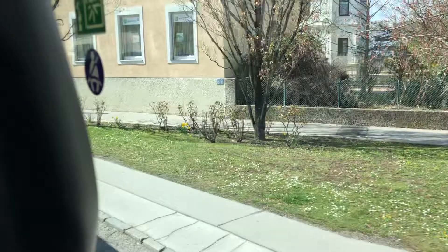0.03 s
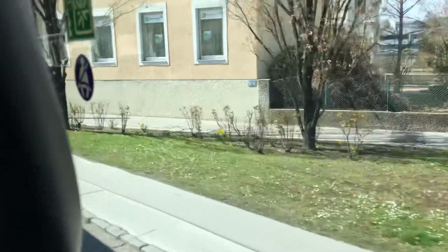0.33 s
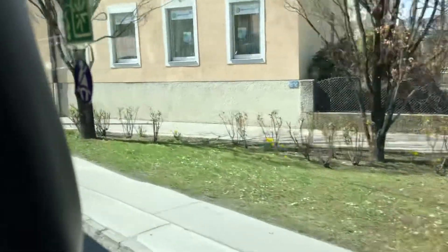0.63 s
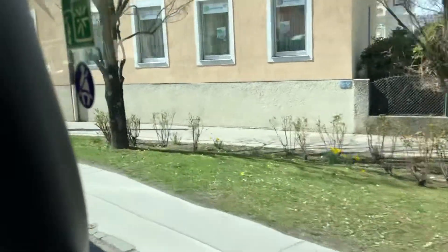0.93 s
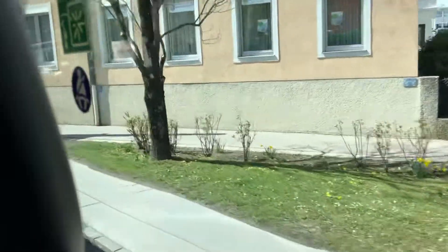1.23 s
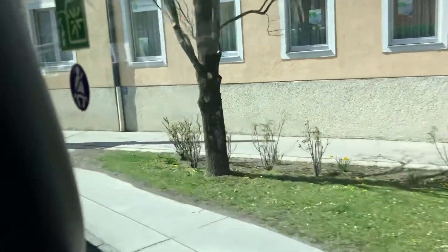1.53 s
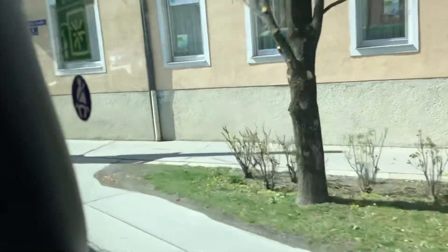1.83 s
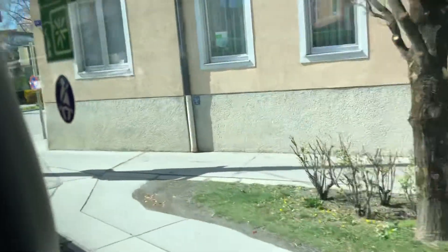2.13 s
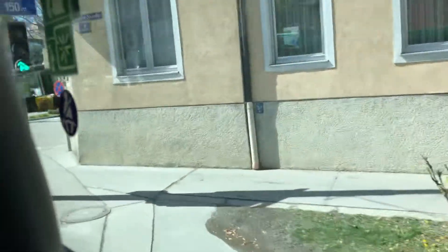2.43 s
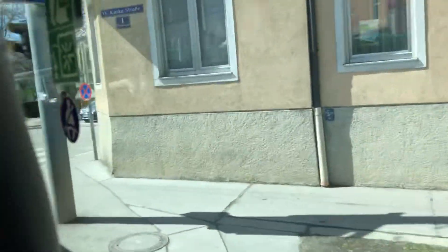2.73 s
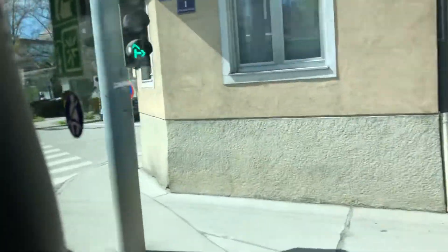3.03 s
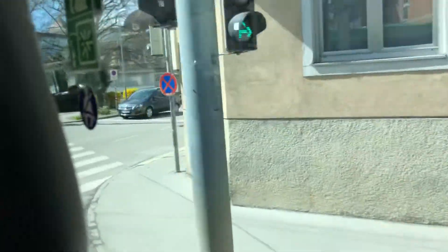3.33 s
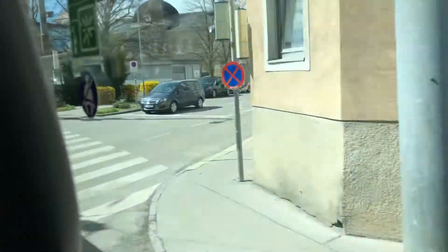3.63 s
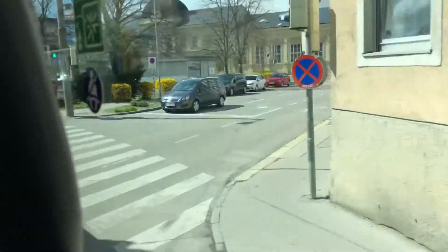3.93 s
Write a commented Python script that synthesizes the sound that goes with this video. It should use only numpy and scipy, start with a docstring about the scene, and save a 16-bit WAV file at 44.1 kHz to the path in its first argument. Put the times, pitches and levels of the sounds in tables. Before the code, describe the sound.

A city bus drives along a street, heard from a window seat inside. Its engine drones and gears whine as it eases off with a brief shudder, coasts, then speeds up slightly. Tyres rumble, with a few soft thuds.

```python
"""City bus, inside, rolling along a street: it eases off with a brief shudder, coasts, then speeds up.
Gears whine with road speed; engine firings drive a cabin boom, low tones and a pulsing roar.
Tyres rumble through the body, which heaves over uneven road and thuds at joints.
Behind that, air rushes, vents and a fan sing faintly, the trim ticks and a thin hiss comes and goes."""
import sys
import numpy as np
from scipy import signal
from scipy.fft import rfft, irfft
from scipy.io import wavfile
from scipy.ndimage import uniform_filter1d

SR = 44100
rng = np.random.default_rng(int(sys.argv[2]) if len(sys.argv) > 2 else 0)


def transcribe(signal):
    """Save signal, clipped to [-1, 1], as a 16-bit WAV file at the path in sys.argv[1]."""
    frames = np.atleast_2d(signal).T
    limited = np.clip(frames, -1, 1)
    pcm = np.round(limited * 32767).astype(np.int16)
    wavfile.write(sys.argv[1], SR, pcm)


N = 176400


def drivetrain():
    """Engine and gears: the engine runs free near idle, then the clutch locks it to one firing a turn."""
    whine_pitch = [(0.0, 407.4), (0.1, 393.0), (0.27, 371.3), (0.44, 353.1), (0.7, 339.6), (0.95, 329.5),
                   (1.3, 327.3), (1.7, 321.7), (1.9, 324.8), (2.25, 320.1), (2.6, 312.3), (3.02, 306.5),
                   (3.45, 301.4), (3.62, 308.5), (3.8, 323.0), (4.0, 335.9)]  # t/s, f/Hz
    free_firing = [(0, 46), (.25, 45), (.37, 44.3), (.48, 46.8), (.63, 47.5), (.75, 49.6)]  # t/s, firing rate/Hz
    engine_load = [(0, -44.5), (.35, -43.5), (.52, -44), (.8, -44), (1.25, -48), (2.5, -49.5), (3, -45.5),
                   (3.4, -51.5), (3.7, -47), (4, -46)]  # t/s, relative level/dB
    whine_per_turn, speed_jitter = 6.8, 0.00124
    lock_s = free_firing[-1][0]
    whine_hz = curve(whine_pitch) * (1 + speed_jitter * walk(15))
    whine_cycles = np.cumsum(whine_hz) / SR
    turns = whine_cycles / whine_per_turn
    firing_hz = np.where(seconds() < lock_s, curve(free_firing), whine_hz / whine_per_turn)
    firings = np.cumsum(firing_hz) / SR
    load = undb(curve(engine_load))
    return (cabin_boom(firings) + gears(whine_cycles, turns) + engine_tones(firings, load)
            + engine_roar(firings, load) + shudder(firings))


def cabin_boom(firings):
    """The cabin booms at four cycles per firing."""
    boom_level = [(0, -42), (.17, -47), (.25, -25.5), (.33, -34), (.43, -30), (.55, -34), (.73, -40.5),
                  (.81, -28.5), (1, -38), (1.12, -31.5), (1.66, -31), (1.75, -40.5), (1.94, -28.5),
                  (2.06, -38), (2.25, -28.5), (2.43, -31.5), (2.55, -48), (2.64, -27.5), (2.8, -35.5),
                  (3.06, -28), (3.14, -41), (3.4, -29), (3.5, -29.5), (3.62, -35.5), (4, -36.5)]  # t/s, relative level/dB
    return undb(curve(boom_level) + 0.5) * tone(4 * firings, rough=0.14, rate_hz=25)


def gears(whine_cycles, turns):
    """Tones locked to road speed: a whine, its third harmonic, a low note, an upper pair, a whistle."""
    whine_level = [(0, -33), (.09, -29), (.17, -34.5), (.27, -37.5), (.38, -37), (.5, -45.5), (.62, -53),
                   (.85, -57), (.98, -44.5), (1.65, -42), (2.25, -43.3), (2.8, -45.3), (3.8, -44.5),
                   (4, -55)]  # t/s, level/dB
    note_level = [(0, -55), (.3, -55), (.53, -40), (1, -50), (1.5, -53), (2.3, -52.5), (3.25, -40.5),
                  (3.7, -47.5), (3.85, -49)]  # t/s, level/dB
    upper_level = [(0, -60), (.18, -57), (.28, -48), (.45, -57), (.78, -52.5), (1.05, -57), (1.25, -62),
                   (2.4, -62), (3.05, -58), (3.55, -58), (4, -66)]  # t/s, level/dB
    upper_orders = [12, 13.6]  # cycles per turn
    upper_db = [0, -.5]  # relative level/dB per order
    whine = undb(curve(whine_level)) * tone(whine_cycles, rough=0.047, rate_hz=18)
    third = undb(-71.5) * tone(3 * whine_cycles, rough=0.4, rate_hz=5)
    note = undb(curve(note_level)) * tone(4.93 * turns, rough=0.52, rate_hz=11)
    upper = sum(undb(db) * tone(order * turns, rough=0.5, rate_hz=22)
                for order, db in zip(upper_orders, upper_db))
    whistle = undb(-69.5) * tone(32.9 * turns, rough=0.41, rate_hz=11)
    return whine + third + note + undb(curve(upper_level)) * upper + whistle


def engine_tones(firings, load):
    """Weaker engine and belt tones follow the load and swell where they cross the cabin's air mode."""
    orders = [1, 1.33, 1.65, 2, 2.48, 2.95, 3.4, 8]  # cycles per firing
    order_db = [-43, -46, -48.5, -38, -45, -43.5, -49.5, -54.5]  # relative level/dB per order
    tones = unit(load) * sum(undb(db) * tone(order * firings, rough=0.94, rate_hz=9)
                             for order, db in zip(orders, order_db))
    return tones + undb(-5) * resonate(tones, hz=182, width_hz=20)


def engine_roar(firings, load):
    """Broad noise that follows the load and pulses with each firing."""
    spectrum = [(90, -5), (150, 0), (220, -26.5), (300, -1.5), (480, 0.5), (690, 2), (800, -3.5),
                (910, -7.5), (1000, -5.5), (1280, -13.5), (1400, -12), (2000, -39.5), (4000, -31)]  # f/Hz, relative density/dB
    pulsing = 1 + 0.1 * np.sin(2 * np.pi * firings)
    return undb(-1) * load * unit(noise(spectrum) * pulsing)


def shudder(firings):
    """Near idle, uneven single firings knock on the body."""
    body_modes = [(55, 45, -2), (136, 40, 0.5), (217, 46, 7), (730, 250, -21)]  # f/Hz, width/Hz, relative level/dB
    pulses = np.diff(np.floor(firings), prepend=0) * undb(1.7 * walk(42))
    knocks = signal.fftconvolve(pulses - pulses.mean(), strike(body_modes, 0))[:N]
    return undb(-31) * swell(at_s=0.26, half_s=0.11) * unit(knocks)


def tyre_rumble():
    """Steady tyre noise carried through the body."""
    spectrum = [(18, -14), (32, -20), (42, 0), (52, 3), (65, -0.5), (100, -3.5), (150, -4), (200, -4),
                (260, -11.5), (330, -17), (450, -18.5), (900, -31.5)]  # f/Hz, relative density/dB
    return undb(-33.5) * noise(spectrum)


def body_heave():
    """Deep swells as the body heaves over uneven road."""
    heaves = [(.34, 0.084, -39.5), (0.686, 0.038, -31), (1.87, 0.09, -32.5), (2.01, 0.039, -34),
              (2.278, 0.082, -34), (2.673, 0.1, -38.5), (2.967, 0.045, -31), (3.124, 0.12, -30.5),
              (3.6, 0.1, -35), (3.973, 0.083, -29)]  # t/s, half length/s, level/dB
    spectrum = [(20, -13.5), (36, -6.5), (48, 10.5), (62, -9), (85, 6), (125, -11), (175, -7), (250, -21),
                (700, -31.5), (1500, -39.5), (3000, -50.5), (8000, -68)]  # f/Hz, relative density/dB
    power = sum((undb(db) * swell(at_s, half_s)) ** 2 for at_s, half_s, db in heaves)
    return np.sqrt(power) * noise(spectrum)


def wheel_thuds():
    """Wheels hit road joints and ring the body's modes."""
    thuds = [(0.246, -26), (.436, -21.5), (1.87, -29.5), (2.621, -32), (3.061, -28)]  # t/s, relative level/dB
    body_modes = [(50.4, 14, 1), (82, 50, 2), (179, 78, 2)]  # f/Hz, width/Hz, relative level/dB
    return sum(undb(db) * strike(body_modes, at_s) for at_s, db in thuds)


def cabin_air():
    """Softly fluttering rush of air, combed by close reflections from windows and seats."""
    spectrum = [(1500, -0.5), (1700, -2), (2050, -6), (2330, -4.5), (2700, -8), (3500, -12), (4050, -14),
                (4600, -15.5), (5000, -14.5), (6200, -19.5), (8000, -23), (12000, -26), (15500, -27)]  # f/Hz, relative density/dB
    ring_s, echo_db, low_cut_hz, flutter_db = 0.02, -14, 1450, 0.83
    direct = noise(spectrum)
    age_s = np.arange(4096) / SR
    response = rng.standard_normal(len(age_s)) * np.exp(-age_s / ring_s)
    echoes = irfft(rfft(direct) * rfft(response / np.linalg.norm(response), N), N)
    highpass = signal.butter(3, low_cut_hz, "high", fs=SR, output="sos")
    air = signal.sosfilt(highpass, direct + undb(echo_db) * echoes)
    return undb(-61 + flutter_db * walk(30.5)) * unit(air)


def vents():
    """Air vents sing faintly in narrow bands."""
    bands = [(2350, 200, -76), (4020, 100, -85.5), (4250, 110, -84.5), (4940, 120, -82), (12450, 450, -88),
             (13830, 200, -88.5)]  # f/Hz, width/Hz, level/dB
    return sum(undb(db) * unit(resonate(rng.standard_normal(N), hz, width_hz))
               for hz, width_hz, db in bands)


def fan():
    """Faint fan note with a wobbling pitch."""
    pitch_hz = 838 * (1 + 0.008 * walk(9))
    return undb(-58) * tone(np.cumsum(pitch_hz) / SR, rough=0.55, rate_hz=24)


def trim():
    """Loose plastic: ticks ring its modes and leave a short tail; rattles shake the same modes."""
    ticks = [(1.425, -56), (2.2376, -41.5), (2.2391, -42), (2.2425, -48), (2.26, -54), (2.64, -53),
             (2.785, -49.5), (2.797, -54)]  # t/s, relative level/dB
    rattles = [(.27, .06, -76), (0.572, .08, -72), (2.8, 0.045, -66), (3.082, .1, -66), (3.924, 0.031, -64)]  # t/s, half length/s, relative level/dB
    modes = [(2480, 330, -1.5), (3120, 200, -.5), (3980, 230, -.5), (4600, 500, -11), (6200, 700, -19)]  # f/Hz, width/Hz, relative level/dB
    band_hz = [1900, 6800]  # low edge/Hz, high edge/Hz
    tail_s, tail_db = 0.018, -22
    t = seconds()
    rings = sum(undb(db) * strike(modes, at_s) for at_s, db in ticks)
    shake = sum(undb(db) * swell(at_s, half_s) for at_s, half_s, db in rattles) * undb(2 * walk(120))
    for at_s, db in ticks:
        age_s = np.maximum(t - at_s, 0)
        shake += (t >= at_s) * undb(db + tail_db) * np.exp(-age_s / tail_s)
    grain = rng.standard_normal(N)
    buzz = sum(undb(db) * resonate(grain, hz, 2 * width_hz) for hz, width_hz, db in modes)
    bandpass = signal.butter(3, band_hz, "band", fs=SR, output="sos")
    return signal.sosfilt(bandpass, rings + shake * unit(buzz))


def hiss():
    """Thin hiss in short spells."""
    spells = [(0.41, 0.484, -65.5), (0.55, 0.652, -64.5), (1.408, 1.813, -68), (1.864, 1.935, -64),
              (1.94, 2.07, -69.5), (2.098, 2.266, -65.5), (2.34, 2.434, -66), (2.608, 2.74, -65.5),
              (2.763, 2.83, -65.5), (2.925, 3.313, -65)]  # start/s, end/s, level/dB
    spectrum = [(800, -24), (3000, 7), (6000, 1), (10000, -2), (15500, -5.5)]  # f/Hz, relative density/dB
    edge_s = 0.0057
    t = seconds()
    gate = sum(undb(db) * np.clip(np.minimum(t - start_s, end_s - t) / edge_s + 0.5, 0, 1)
               for start_s, end_s, db in spells)
    return gate * noise(spectrum)


def undb(db):
    """Decibels to gain."""
    return 10 ** (np.asarray(db) / 20)


def unit(x):
    """Scale to rms 1."""
    return x / np.sqrt(np.mean(x ** 2))


def seconds():
    """Time of every sample."""
    return np.arange(N) / SR


def curve(rows):
    """Join (t/s, value) rows with straight lines."""
    return np.interp(seconds(), *np.array(rows, float).T)


def swell(at_s, half_s):
    """Gaussian envelope, 1/e at half_s from its peak."""
    return np.exp(-((seconds() - at_s) / half_s) ** 2)


def walk(rate_hz):
    """Random drift of rms 1: held steps, smoothed twice."""
    hold = int(SR / rate_hz)
    steps = np.repeat(rng.standard_normal(1024), hold)[:N]
    return unit(uniform_filter1d(uniform_filter1d(steps, hold), hold))


def noise(spectrum):
    """Noise of rms 1 shaped by (f/Hz, density/dB) rows, falling 12 dB/octave beyond them."""
    hz, db = np.array(spectrum, float).T
    f = np.maximum(np.arange(N // 2 + 1) * SR / N, 1)
    gain = undb(np.interp(np.log(f), np.log(hz), db))
    skirts = np.minimum(f / hz[0], 1) ** 2 * np.minimum(hz[-1] / f, 1) ** 2
    return unit(irfft(rfft(rng.standard_normal(N)) * gain * skirts, N))


def tone(cycles, rough, rate_hz):
    """Sine of rms near 1 whose strength and phase waver."""
    waver = 1 + rough * (walk(rate_hz) + 1j * walk(rate_hz))
    carrier = np.exp(2j * np.pi * (cycles + rng.random()))
    return np.sqrt(2 / (1 + 2 * rough ** 2)) * np.imag(waver * carrier)


def resonate(x, hz, width_hz):
    """One resonance, gain 1 at its centre."""
    return signal.lfilter(*signal.iirpeak(hz, hz / width_hz, fs=SR), x)


def strike(modes, at_s):
    """Modes (f/Hz, width/Hz, level/dB) ringing down from a blow."""
    age_s = np.maximum(seconds() - at_s, 0)
    return sum(undb(db) * np.exp(-np.pi * width_hz * age_s) * np.sin(2 * np.pi * hz * age_s)
               for hz, width_hz, db in modes)


def scene():
    """Mono mix at a window seat."""
    driving = drivetrain() + tyre_rumble() + body_heave() + wheel_thuds()
    background = cabin_air() + vents() + fan() + hiss() + trim()
    return (driving + background)[None]


def record(dry):
    """Steep low-pass on the top treble."""
    top_hz = 15750
    return signal.sosfilt(signal.ellip(10, 0.1, 80, top_hz, fs=SR, output="sos"), dry)


dry = scene()
out = record(dry)
transcribe(out)
```